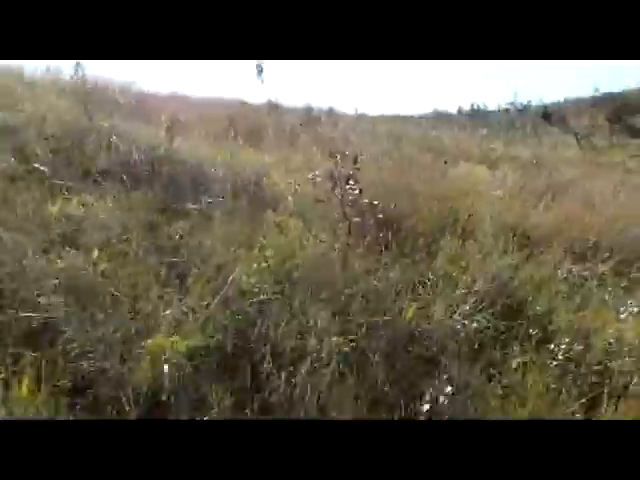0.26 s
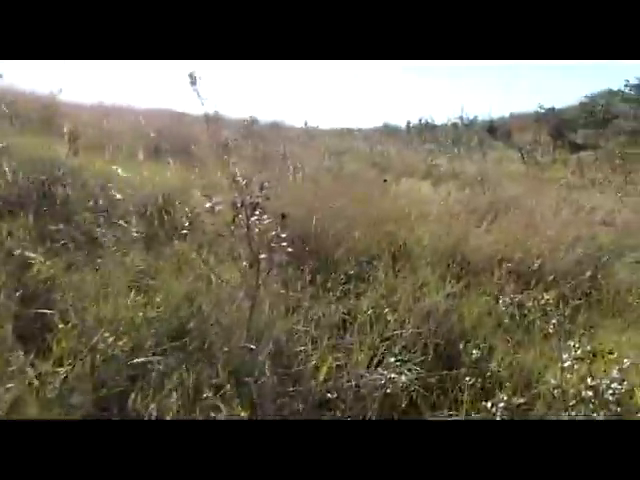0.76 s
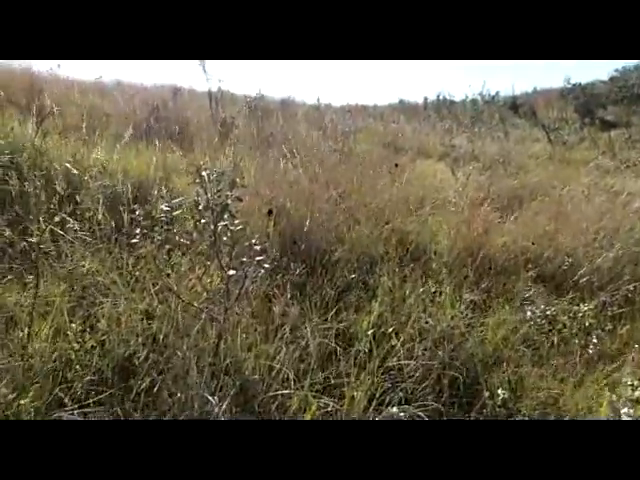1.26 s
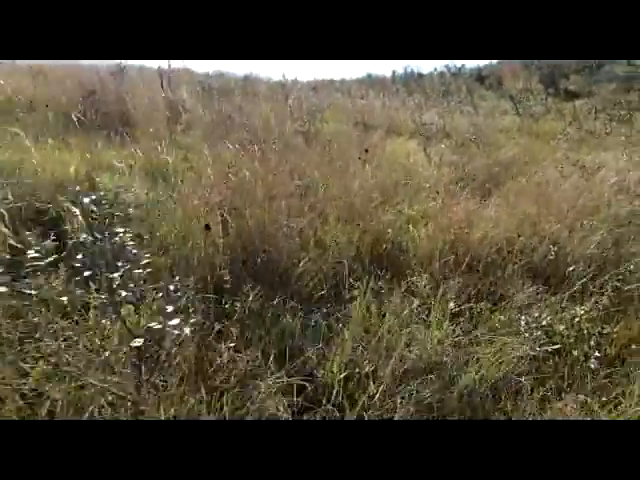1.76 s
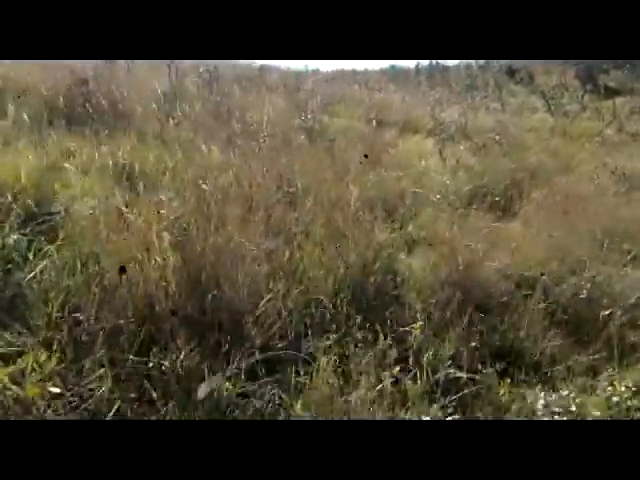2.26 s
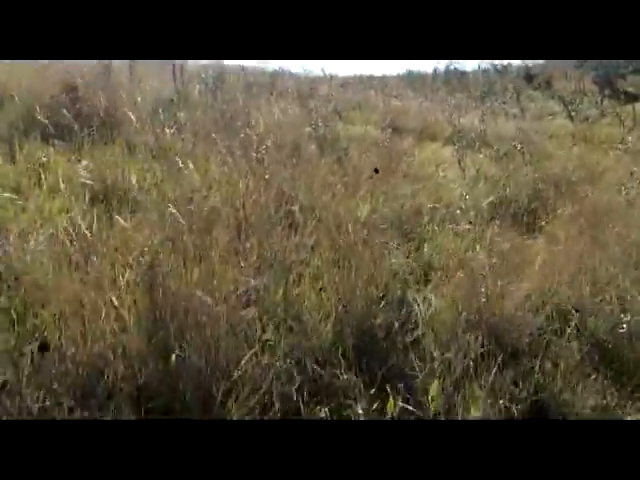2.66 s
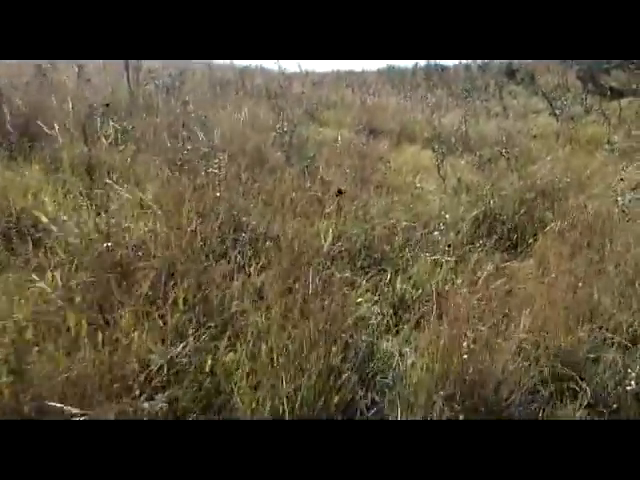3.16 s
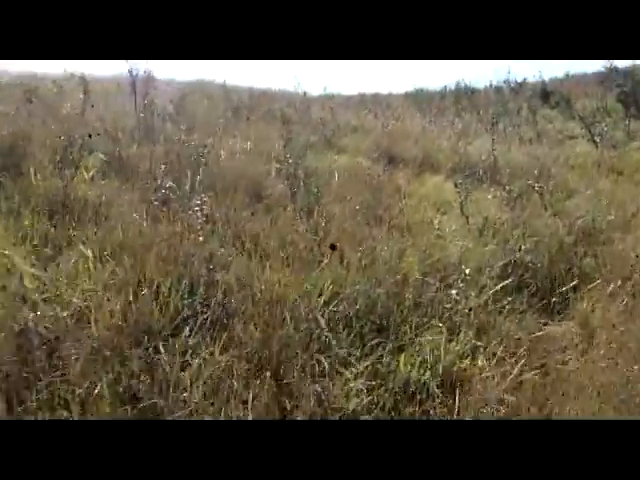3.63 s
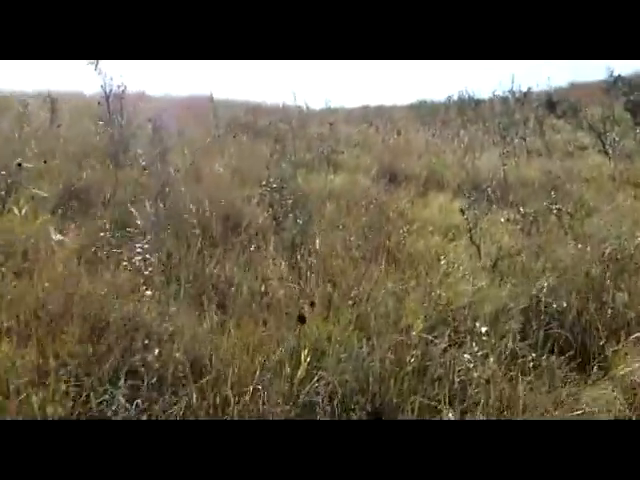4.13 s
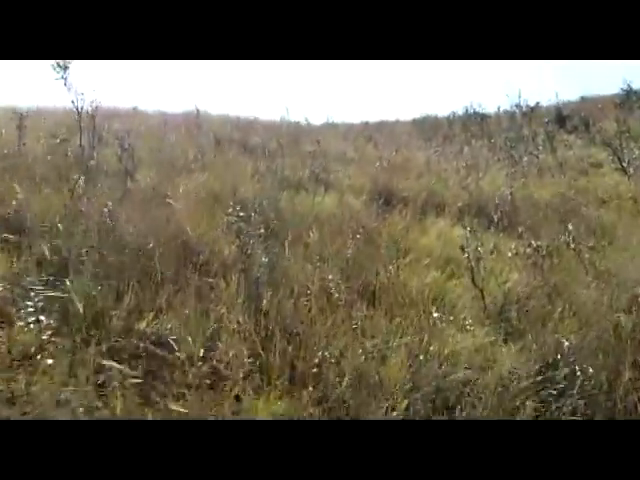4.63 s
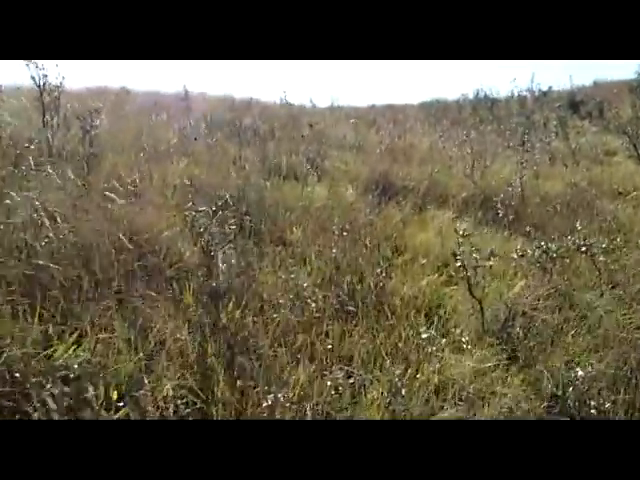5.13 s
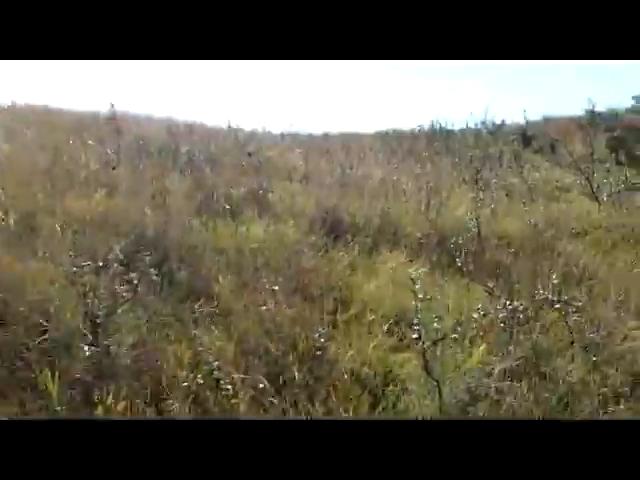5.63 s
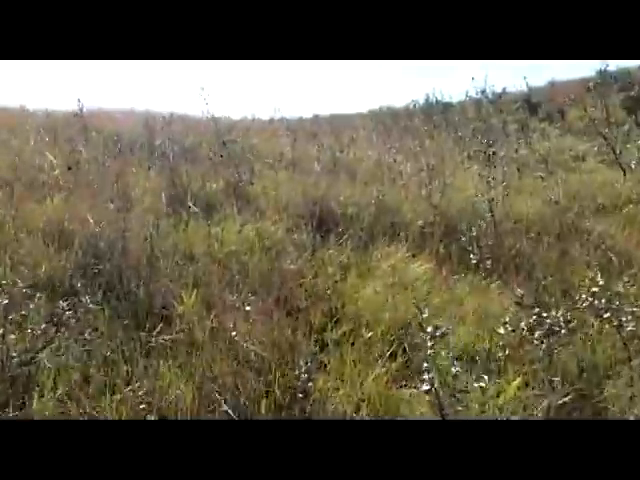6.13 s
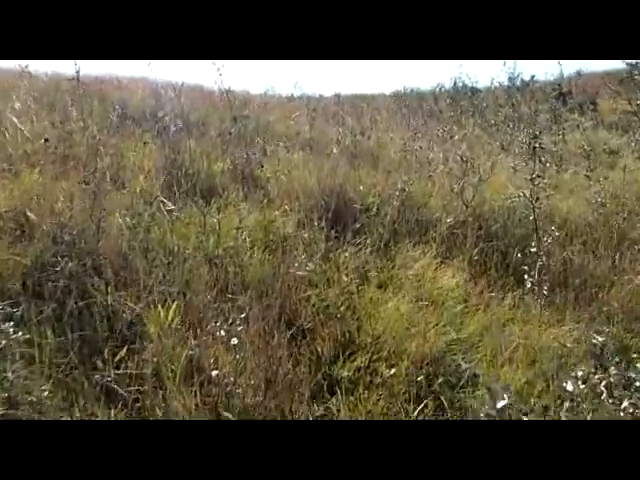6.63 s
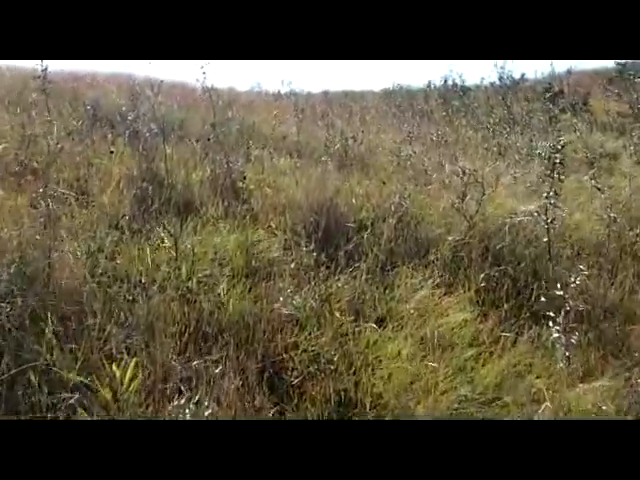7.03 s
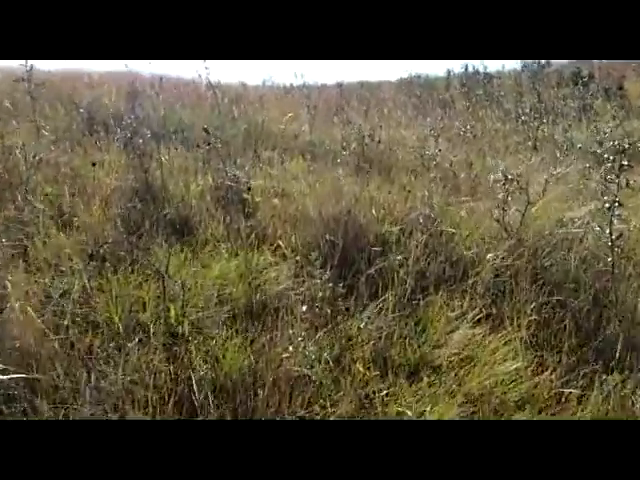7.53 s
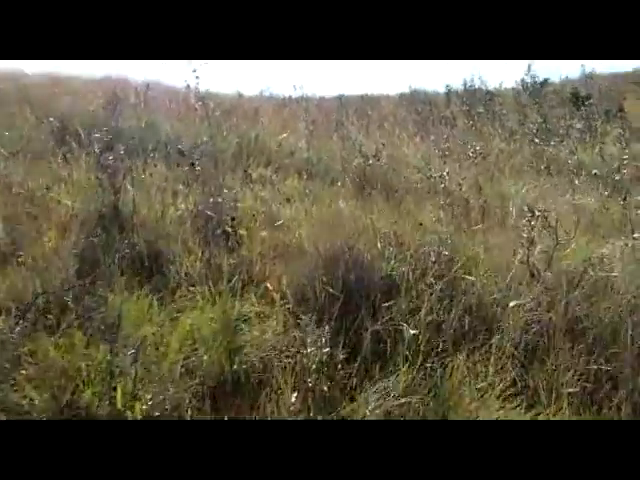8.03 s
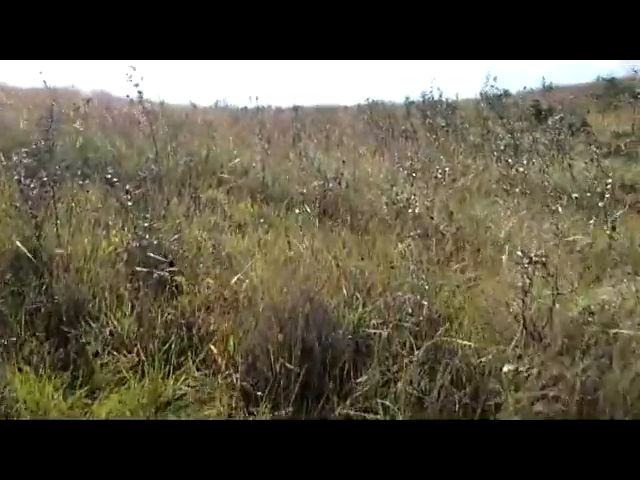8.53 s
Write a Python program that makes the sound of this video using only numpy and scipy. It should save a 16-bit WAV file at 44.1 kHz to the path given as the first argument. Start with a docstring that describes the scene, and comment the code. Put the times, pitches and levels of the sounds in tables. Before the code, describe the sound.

Footsteps rustle through dry meadow grass under loud, uneven wind rumble on the microphone, with a few snapping stalks.

```python
"""Gusts in tall dry grass

A small camera is carried through a meadow. Each of its two microphone ports rumbles with its own eddies: the
faster the flow, the higher the rumble. Legs swish through the stalks, a few stalks snap, and the meadow hisses
around a cricket. Now and then the grass sound dips abruptly and creeps back."""
import sys
import numpy as np
from scipy import signal
from scipy.fft import rfft, irfft, next_fast_len
from scipy.io import wavfile
from scipy.ndimage import uniform_filter1d, minimum_filter1d, map_coordinates

SR = 44100
rng = np.random.default_rng(int(sys.argv[2]) if len(sys.argv) > 2 else 0)


def materialize(psi):
    """Save the field psi as 16-bit PCM at rate SR to the path in sys.argv[1].

    A 1-D psi becomes a single channel; in a 2-D psi each row is a channel.
    """
    bounded = np.clip(np.atleast_2d(psi).T, -1, 1)
    quanta = np.round(bounded * 32767).astype(np.int16)
    wavfile.write(sys.argv[1], SR, quanta)


N = 387198

# Levels are relative: each layer adds its own trim.
# the bed of air between gusts [t/s, left level/dB, right level/dB]
LULL = [(0, -32, -27), (.4, -34, -25), (.9, -28, -36), (1.22, -23, -32), (2.1, -23, -27),
        (2.95, -19, -21.5), (3.6, -33, -35.5), (4.15, -33, -42), (5.05, -22.5, -41), (5.72, -24, -41),
        (5.99, -33, -33), (6.26, -29, -38), (6.68, -28, -39.5), (7.5, -31, -35), (8.17, -28, -25),
        (8.26, -36, -36.5), (8.38, -35, -39), (8.78, -34.5, -42)]
# gusts, f being the eddy rate [start t/s, end t/s, left level/dB, left f/Hz, right level/dB, right f/Hz]
GUSTS = [(-.05, 0.142, -20, 110.1, -24, 169.5), (0.152, 0.281, -12.5, 230.3, -19, 269.7),
         (.28, .385, -19.5, 329, -21, 369), (0.435, .63, -17.5, 169.8, -22, 348.8),
         (0.636, 0.701, -19.5, 160.1, -26, 219.9), (0.731, 0.825, -25, 140.3, -28.5, 159.9),
         (0.972, 1.069, -19, 98.94, -30, 189.1), (1.07, 1.186, -17, 242, -24, 349),
         (1.2, 1.331, -24, 120.1, -30.5, 170.1), (1.331, 1.419, -17.5, 110.3, -22, 170.1),
         (1.42, 1.51, -15.5, 149.6, -19.5, 180.3), (1.55, 1.661, -14, 165.1, -11, 269.4),
         (1.661, 1.79, -14.5, 130, -24.5, 169.3), (1.8, 1.929, -16.5, 174.9, -20.5, 419.2),
         (1.929, 2.075, -19, 210.2, -21, 380.9), (2.131, 2.475, -18.5, 149.5, -28, 189.8),
         (2.475, 2.611, -18.5, 210.8, -17, 427.5), (2.611, 2.78, -15.5, 175.4, -22, 280.8),
         (2.782, 2.931, -17, 139.9, -29, 184.4), (2.988, 3.099, -18.5, 200.5, -20, 220),
         (3.101, 3.26, -17, 191.4, -21.5, 318.5), (3.259, 3.499, -17, 230.6, -25.5, 219.8),
         (3.661, 3.844, -29.5, 138.4, -25.5, 160.2), (3.841, 4.061, -28.5, 109.9, -32, 144.7),
         (4.208, 4.275, -26, 139.6, -24, 130), (4.274, 4.359, -13, 179.8, -30, 124.9),
         (4.357, 4.528, -21, 170.3, -18, 288.4), (4.53, 4.762, -16, 240.1, -22, 299.2),
         (4.759, 4.909, -14, 160.2, -19.5, 259.3), (4.916, 5.03, -18.5, 230.6, -26, 328.4),
         (5.073, 5.187, -17, 169.4, -15, 269.4), (5.191, 5.31, -16.5, 340.3, -22, 398.4),
         (5.309, 5.429, -18.5, 260.1, -23, 280), (5.421, 5.56, -20, 149.9, -26, 180),
         (5.6, 5.71, -16.5, 149.8, -27.5, 200.2), (5.741, 5.831, -10, 150, -13, 219.6),
         (5.829, 5.953, -12, 310.3, -17.5, 300.2), (6.055, 6.13, -15, 340.2, -17, 409.6),
         (6.13, 6.25, -17.5, 230.1, -25, 250), (6.279, 6.345, -16, 200.1, -18.5, 240),
         (6.345, 6.426, -12.5, 309.8, -10.5, 380.3), (6.425, 6.601, -23, 230, -27, 290.2),
         (6.75, 6.901, -22.5, 131.6, -27.5, 199.8), (6.912, 7.0, -17.5, 135.3, -26, 269.8),
         (7.041, 7.19, -16, 249.6, -21, 259.7), (7.2, 7.25, -11, 227.6, -15.5, 380.7),
         (7.278, 7.5, -20, 180.3, -23.5, 239.3), (7.528, 7.661, -17, 160, -22, 210.4),
         (7.66, 7.85, -15, 175, -21.5, 259.7), (7.852, 8.06, -14, 170, -24, 251),
         (8.06, 8.171, -22.5, 229.6, -21, 180.6), (8.412, 8.48, -10.5, 198.9, -30, 129.9),
         (8.499, 8.589, -16.5, 209.7, -16.5, 159.6)]
# short puffs on top of the flow [t/s, half width/ms, left lift/dB, right lift/dB]
PUFFS = [(0.101, 10.4, 8, 10), (0.16, 5.96, 10, 10), (0.347, 15.6, 8, 2), (0.688, 9.6, 6, 13.5),
         (.744, 7.27, 13, 0), (0.806, 6.26, 10.5, 8), (.864, 11.3, 24, 20.5), (1.0, 16.3, 8, 12),
         (1.15, 12.5, 6, 3), (1.234, 16.1, 5, 12), (1.499, 9.66, 10, 10.5), (1.954, 8.1, 0, 11.5),
         (2.046, 17.4, 5, 10), (2.176, 6.6, 13, 6), (2.216, 8.7, 12, 20), (2.287, 7.43, 8.5, 14.5),
         (2.351, 19.4, 0, 8), (2.415, 8.4, 7, 5), (2.58, 8.7, 7, 5), (2.7, 6.6, 4, 9), (2.77, 5.28, 4, 9.5),
         (3.029, 11.4, 5, 5), (3.065, 8.1, 6, 4), (3.104, 8.2, 10, 0), (3.18, 13.7, 8, 2),
         (3.28, 14.3, 6, 6), (3.33, 9.7, 4, 8), (3.39, 12, 5, 8), (3.468, 12, 6, 3),
         (3.552, 10.05, 17.5, 11.5), (3.789, 12.6, 5, 3), (4.062, 6.03, 5, 5), (4.14, 10, 2, 8),
         (4.521, 17.7, 0, 10), (5.059, 7.8, 8, 14.5), (5.16, 8, 2, 10), (5.386, 10.6, 0, 8),
         (5.625, 6.9, 9, 15.5), (5.693, 8.11, 0.5, 11.5), (6.026, 10, 19, 12.5), (6.198, 7, 6, 6),
         (6.5, 10.9, 6, 12), (6.595, 18.2, 11, 9.5), (6.832, 7.3, 8.5, 6), (6.94, 8.7, 9, 9.5),
         (7.045, 7.9, 15, 8), (7.303, 7.7, 4, 9.5), (7.471, 16.9, 7.5, 2), (7.541, 7.9, 12.5, 5),
         (7.689, 11.95, 4, 9.5), (8.126, 17.2, 8.5, 0), (8.667, 12.2, 17.5, 7.5), (8.769, 10, 17.5, 12.5)]
# tone colour of a passing eddy [multiple of the eddy rate, level/dB]
EDDY_COLOUR = [(.1, -24), (.4, 3), (.8, 2), (1.4, -5.5), (2.5, -15.5), (4.5, -35.5), (8, -49.5), (16, -62)]
# small hard eddies that flick one port [t/s, port (0 left, 1 right), level/dB, eddy rate f/Hz]
FLICKS = [(.161, 0, -16, 450), (.248, 0, -14.5, 696), (.322, 1, -14, 600), (.303, 1, -11, 400.2),
          (.34, 0, -11, 523), (.5, 1, 0, 429.1), (.562, 1, -13, 507.6), (.804, 1, -11, 730.5),
          (.852, 0, -23, 504.6), (1.087, 1, -17, 801.2), (1.117, 0, -19, 600.3), (1.498, 1, -18, 700),
          (1.616, 1, -18, 450.5), (1.837, 1, 6, 694.8), (1.843, 0, -17, 1400), (1.9, 1, -1, 493.6),
          (1.949, 0, -7.5, 903), (1.959, 1, -26, 755), (2.055, 0, -6, 1180), (2.179, 0, -16, 992),
          (2.291, 0, -18, 1077), (2.331, 1, -21, 1154), (2.483, 1, -22, 502.2), (2.523, 0, 0, 664.6),
          (2.585, 1, -7, 620), (2.768, 1, -17, 500), (3.105, 0, -16, 859.3), (3.177, 0, -32.5, 1280),
          (3.334, 0, -15.5, 710), (3.467, 0, -13, 1245), (4.661, 0, -9, 404), (4.726, 0, 17, 590),
          (4.952, 1, -5, 501.8), (4.983, 0, -22, 1100), (5.007, 0, -26, 1100), (5.164, 1, -12, 498.4),
          (5.209, 0, -20, 1001), (5.241, 0, -11, 1110), (5.288, 1, -2, 711.7), (5.331, 0, -13, 749.7),
          (5.626, 1, -15.5, 631.7), (5.846, 0, -14, 895.7), (5.892, 0, -14, 780), (5.918, 0, -5, 756),
          (6.085, 0, -16, 1019), (6.14, 0, -17, 797.7), (6.358, 0, -14, 810.8), (6.417, 0, -17, 1150),
          (6.497, 0, -17.5, 920), (6.9, 1, -26, 1189), (7.075, 0, -17, 489.4), (7.243, 1, -16.5, 801),
          (7.379, 1, -16.5, 402.8), (7.537, 0, -18, 499.8), (7.589, 0, -17.5, 801), (7.686, 0, -20, 900.3),
          (7.866, 1, -21, 603.3), (7.969, 0, -37, 604), (8.14, 0, -18.5, 740)]
# fader ride of the meadow bed [t/s, level/dB]
MEADOW_RIDE = [(0, -58.5), (.4, -61.5), (.8, -62.5), (.98, -47), (1.6, -43.5), (1.9, -48.5), (2.08, -39.5),
               (2.45, -54.5), (2.75, -65.5), (3.0, -56.5), (3.2, -66), (3.52, -59.5), (3.76, -44.5),
               (4.38, -48.5), (4.7, -59), (5.15, -57.5), (5.4, -62), (5.75, -54), (6.1, -59), (6.45, -58.5),
               (6.6, -63), (6.88, -46), (7.1, -58.5), (7.6, -51.5), (8.08, -64), (8.45, -48.5), (8.78, -47)]
# tone colour of the wider meadow through the camera shell [f/Hz, level/dB]
MEADOW_COLOUR = [(300, -17), (700, 0), (1600, -5), (2700, -7.5), (3300, 0), (3700, -4.5), (4090, -19.5),
                 (5400, -10), (8000, -24), (15700, -34.5)]
# tone colour of the nearby stalks through the camera shell [f/Hz, level/dB]
STALK_COLOUR = [(300, -35), (900, -16), (2500, -15), (3300, -14.5), (4090, -20), (4800, -7), (5400, -1),
                (6200, -7.5), (7300, -14), (9500, -14.5), (11500, -12.5), (13500, -20), (15700, -27)]
# how alike the two sides of a rustle are [f/Hz, left-right correlation]
RUSTLE_LIKENESS = [(300, .1), (640, .75), (1400, .9), (3100, .95), (5500, .92), (9000, .75), (15000, .62)]
# stereo balance of a rustle [f/Hz, left minus right level/dB]
RUSTLE_PAN = [(400, -4), (700, 2.5), (2400, 1), (5000, 4.5), (9000, 2.5), (14000, 4.5)]
# the cricket against the meadow bed [t/s, level/dB]
CRICKET_RIDE = [(0, -4), (1, -13), (2, -17), (3, -7), (3.9, -10), (4.7, -11), (5.5, -17), (6.3, -7),
                (7, -4.5), (7.4, -5), (7.8, -20), (8.2, -4), (8.78, -6)]
# a leg swings through the stalks [full swish t/s, hold/s, level/dB, attack/(dB/s)]
STRIDES = [(0.068, 0.092, -41.5, 120), (0.67, 0.044, -44.5, 200), (0.837, .03, -46.5, 200),
           (1.021, 0.0798, -55, 100), (1.282, 0.022, -35.5, 158), (1.421, .07, -64, 100),
           (1.661, .17, -43.5, 84), (1.919, 0.025, -39.5, 163), (2.049, 0.019, -54, 200),
           (2.419, 0.075, -41.5, 120), (2.95, .05, -50, 91), (3.13, 0.0087, -43.5, 141),
           (3.282, 0.069, -52.5, 102), (3.639, 0.031, -38.5, 206), (3.754, 0.034, -33.5, 180),
           (3.861, 0.033, -42, 100), (4.262, 0.031, -29, 500), (4.438, 0.065, -40, 100),
           (5.013, 0.15, -43, 102), (5.736, 0.052, -35.5, 250), (6.3, 0.038, -45.5, 169),
           (6.879, .06, -45.5, 94), (7.018, 0.014, -35.5, 141), (7.441, 0.025, -49.5, 100),
           (7.652, .04, -44.5, 86), (8.329, 0.11, -34.5, 280), (8.52, 0.022, -37, 150),
           (8.74, .06, -51, 60)]
# the level of the grass sound dips abruptly [t/s, depth/dB]
DUCKS = [(.247, 0.5), (.746, 2), (0.866, 6.5), (1.087, 14.5), (1.5, 12.5), (1.846, 15.5), (1.954, 9),
         (2.063, 15.5), (2.289, 2), (2.526, 4), (3.344, 4), (4.31, 5.5), (4.377, 4.5), (5.12, 5),
         (5.809, 4), (5.94, 5.5), (6.09, 4), (6.37, 0), (6.427, 7), (7.245, 12.5), (8.461, 5.5)]
# single stalks snap [t/s, level/dB, left minus right level/dB]
SNAPS = [(0.275, -35, 3), (1.1726, -29, 5), (1.3358, -32, 5), (3.3146, -35, 2), (3.339, -34, 5),
         (3.866, -31, 4), (3.892, -22.5, 5), (3.9458, -18.5, 3), (4.0085, -29, 12), (4.2421, -33, -6),
         (4.567, -33, 6), (4.5774, -40, 3.5), (4.5971, -43, 4), (6.4203, -43, -3), (6.8897, -30, -2)]


def amp(db):
    """Gain of a level in dB."""
    return 10 ** (np.asarray(db) / 20)


def unit(x):
    """Scaled to rms 1."""
    return x / np.sqrt(np.mean(x ** 2) + 1e-20)


def along(points, hz):
    """A curve through (f/Hz, value) points on a log frequency axis, read at hz."""
    f, values = np.transpose(points)
    return np.interp(np.log(hz + 1e-3), np.log(f + 1e-3), values)


def rides(rows):
    """Fader rides: one value per sample for each column after the time."""
    times, *columns = np.transpose(rows)
    return np.array([np.interp(np.arange(N) / SR, times, column) for column in columns])


def wobble(rate):
    """A smooth random curve, rate knots a second."""
    return map_coordinates(rng.standard_normal(N // 100), [np.arange(N) * rate / SR])


def filtered(x, response, rate=SR):
    """x through an EQ given as gain against frequency."""
    size = next_fast_len(x.shape[-1] + 8192)
    return irfft(rfft(x, size) * response(np.fft.rfftfreq(size, 1 / rate)), size)[..., :x.shape[-1]]


def flow(lull_hz=(125.13, 164.7), edge_s=.02, puff_hurry=.45):
    """Level and log eddy rate at each port: gusts swell out of the lull, puffs ride on them."""
    t = np.arange(N) / SR
    lull_db, lull_log_hz = rides(LULL), np.log(lull_hz)[:, None]
    level_db, log_hz = lull_db.copy(), lull_log_hz + np.zeros(N)
    for start, end, left_db, left_hz, right_db, right_hz in GUSTS:
        near = slice(max(0, round((start - .1) * SR)), round((end + .1) * SR))
        swell = (np.tanh((t[near] - start) / edge_s) - np.tanh((t[near] - end) / edge_s)) / 2
        progress = np.clip((t[near] - start) / (end - start), 0, 1)
        crest = .25 * (np.sin(np.pi * progress) - .5)  # fastest in mid-gust
        level_db[:, near] += swell * ([[left_db], [right_db]] - lull_db[:, near])
        log_hz[:, near] += swell * (np.log([[left_hz], [right_hz]]) - lull_log_hz + crest)
    for at, width_ms, *lifts in PUFFS:
        near = slice(max(0, round((at - .1) * SR)), round((at + .1) * SR))
        bump = np.exp(-.5 * (1000 * (t[near] - at) / width_ms) ** 2)
        lift_db = np.abs(lifts)[:, None]
        level_db[:, near] += lift_db * bump
        log_hz[:, near] += puff_hurry * lift_db / (lift_db + 4) * bump
    return level_db, log_hz


def eddies(rate_hz, evenness=.71, clump_db=4.5, hurry=.1):
    """A frozen row of eddies is carried past a port in clumps; the strong clumps pass faster."""
    points_per_eddy = 40
    row = rng.standard_normal(200000)
    row = unit(filtered(row, lambda f: amp(along(EDDY_COLOUR, f)), points_per_eddy))
    strength = np.sqrt(np.abs(uniform_filter1d(row ** 2, size=60)) + .013)
    row = unit(row / strength ** evenness)  # neighbouring eddies are of like strength
    row = unit(row * (np.abs(row) + .38) ** .4)  # the pressure is pointed at each core
    clump = map_coordinates(rng.standard_normal(5000), [.7 * np.cumsum(rate_hz) / SR], mode="mirror")
    position = np.cumsum(rate_hz * np.exp(hurry * clump)) * points_per_eddy / SR
    return amp(clump_db * clump) * map_coordinates(row, [position], mode="mirror")


def wind():
    """Each port rumbles in its own flow; flutter and surge push level and pitch up together."""
    level_db, log_hz = flow()
    flutter = np.array([wobble(45), wobble(45)])
    surge = np.array([wobble(16), wobble(16)])
    rumble = [eddies(hz) for hz in np.exp(log_hz + .07 * flutter + .06 * surge)]
    ports = amp(level_db + 2.38 * flutter + 1.37 * surge - 3) * rumble + flicks()
    bleed = filtered(ports[::-1], lambda hz: .41 / (1 + (hz / 60) ** 2))  # big eddies cover both ports
    # low cut: the ports leak the slowest pressure
    return filtered(ports + bleed, lambda hz: (1j * hz / (45 + 1j * hz)) ** 2)


def rustle(colour, patchy_db, crackle):
    """Stereo hiss of dry grass at rms 1: patchy noise, made grainy by sparse contacts."""
    def mid_side_eq(hz):
        width = np.arccos(np.clip(along(RUSTLE_LIKENESS, hz), 0, 1)) / 2
        return amp(along(colour, hz)) * [np.cos(width), np.sin(width)]

    spectra = signal.stft(rng.standard_normal((2, N)), nperseg=256)[2]
    patches = uniform_filter1d(rng.standard_normal(spectra.shape[1:]), size=6, axis=0)
    patches = unit(uniform_filter1d(patches, size=12, axis=1))
    hiss = unit(signal.istft(spectra * amp(patchy_db * patches), nperseg=256)[1][:, :N])
    contacts = unit(rng.standard_normal(N) ** 3) * rng.standard_normal((2, N))
    mid, side = filtered(hiss + crackle * contacts, mid_side_eq)
    stereo = np.array([mid + side, mid - side])
    return unit(filtered(stereo, lambda hz: amp(np.outer([.5, -.5], along(RUSTLE_PAN, hz)))))


def meadow(bed_db):
    """The wider meadow: a soft hiss with hardly any grain."""
    return amp(bed_db + 1.5) * rustle(MEADOW_COLOUR, patchy_db=2.1, crackle=.05)


def cricket(bed_db, wing_hz=3290, strokes_per_s=45.2):
    """A trill just left of centre: each wing stroke is a short tone that sinks a little in pitch."""
    stroke_phase = (np.arange(N) / SR - 7.354) * strokes_per_s % 1
    pitch_hz = wing_hz * (1 - .033 * (stroke_phase - .5) + .014 * wobble(40))
    trill = unit(np.sin(np.pi * stroke_phase) ** 6.4 * np.sin(2 * np.pi * np.cumsum(pitch_hz) / SR))
    level_db = bed_db + rides(CRICKET_RIDE)[0] + 2.3 * wobble(9.5)
    return amp(level_db) * amp([[1.2], [-1.2]]) * trill


def leg_swish(bed_db, release_db_per_s=113):
    """Legs sweep the stalks aside: a grainy rustle swells, holds and fades with each stride."""
    t = np.arange(N) / SR
    power = amp(bed_db + 2) ** 2  # stalks still touch between strides
    for at, hold_s, db, attack_db_per_s in STRIDES:
        near = slice(max(0, round(at * SR) - SR // 2), round(at * SR) + SR // 2)
        age = t[near] - at
        fade_db = attack_db_per_s * np.maximum(-age, 0) + release_db_per_s * np.maximum(age - hold_s, 0)
        power[near] += amp(db - fade_db) ** 2
    return np.sqrt(power) * amp(1.1 * wobble(35)) * rustle(STALK_COLOUR, patchy_db=1.5, crackle=.5)


def flicks():
    """A small hard eddy hits one port: about one swing of pressure with a ragged wake."""
    lead = 300  # samples ahead of the hit
    out, t = np.zeros((2, N + SR)), np.arange(-lead, 500) / SR
    phases, wakes = rng.random(len(FLICKS)), rng.standard_normal((len(FLICKS), 60))
    wake_fade = np.exp(-.5 * (t / .0049) ** 2) * signal.windows.tukey(len(t))
    for (at, port, db, hz), phase, wake in zip(FLICKS, phases, wakes):
        swing = np.exp(-.5 * (t * hz / .19) ** 2) * np.cos(2 * np.pi * (hz * t + phase))
        ragged = map_coordinates(wake, [30 + 2.525 * hz * t], mode="mirror") * wake_fade
        out[round(port), round(at * SR):][:len(t)] += amp(db + 6.5) * (swing + .31 * ragged)
    return out[:, lead:N + lead]


def ducking(recover_s=.23):
    """Gain of the grass: it drops abruptly on each cue and creeps back."""
    t, depth_db = np.arange(N) / SR, np.zeros(N)
    for at, db in DUCKS:
        after = slice(round(at * SR), round(at * SR) + SR)
        depth_db[after] += db * np.exp(-(t[after] - at) / recover_s)
    return amp(-depth_db)


def snaps(t60_s=.0055):
    """A dry stalk breaks: a tiny burst of noise in the colour of the stalks."""
    out, t = np.zeros((2, N + SR)), np.arange(300) / SR
    for at, db, pan_db in SNAPS:
        burst = amp(db - 60 * t / t60_s) * rng.standard_normal(len(t))
        out[:, round(at * SR):][:, :len(t)] += burst * amp([[pan_db / 2], [-pan_db / 2]])
    return filtered(out[:, :N], lambda hz: amp(11 + .85 * along(STALK_COLOUR, hz)))


def scene():
    """Wind up front; swish, meadow and cricket duck together, while the snaps cut through."""
    rumble = wind()
    bed_db = rides(MEADOW_RIDE)[0]
    grass = leg_swish(bed_db) + meadow(bed_db) + cricket(bed_db)
    return rumble + ducking() * grass + snaps()


def record(dry):
    """A fast limiter holds the hardest gusts down, and a brick-wall high cut trims the top."""
    ceiling, window_samples, high_cut_hz = .43, 261, 15700
    needed_gain = np.minimum(1, ceiling / (np.abs(dry) + 1e-9))
    gain = uniform_filter1d(minimum_filter1d(needed_gain, window_samples), window_samples)
    return filtered(dry * gain, lambda hz: hz < high_cut_hz)


dry = scene()
out = record(dry)
materialize(out)
```